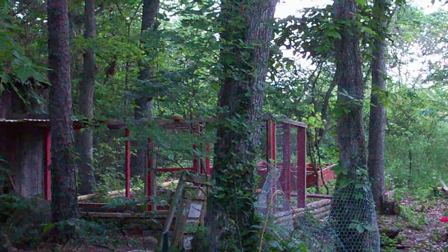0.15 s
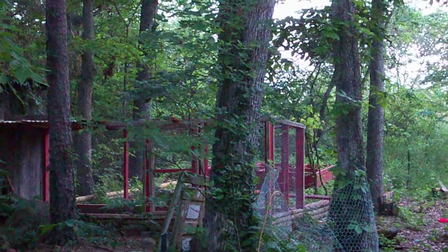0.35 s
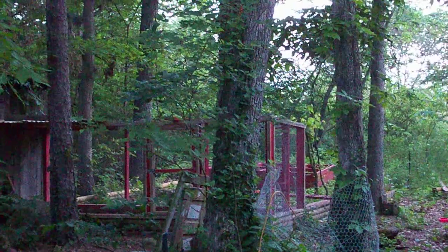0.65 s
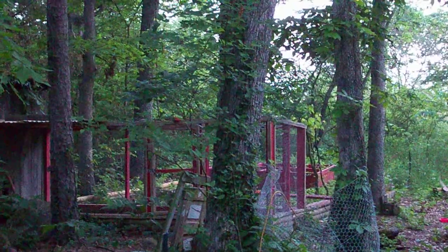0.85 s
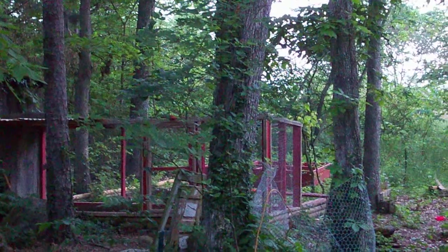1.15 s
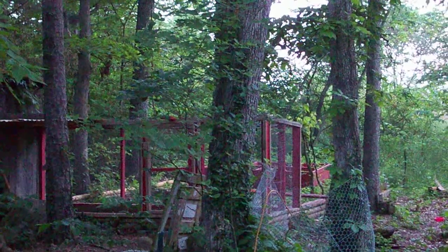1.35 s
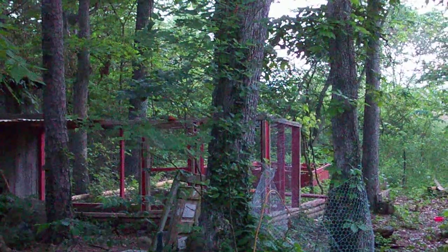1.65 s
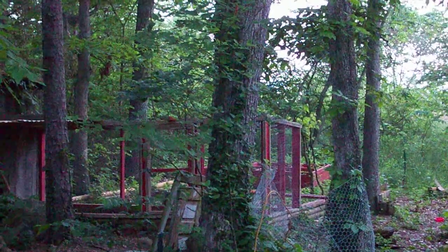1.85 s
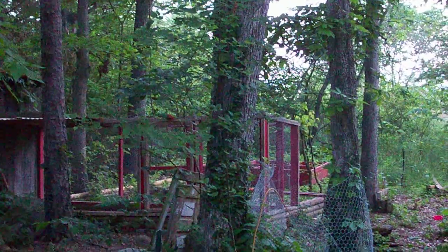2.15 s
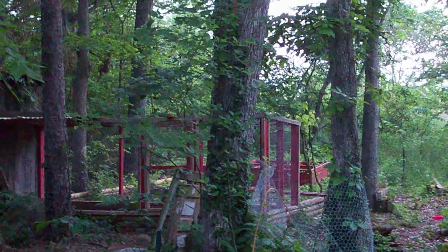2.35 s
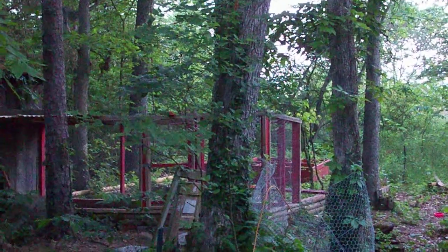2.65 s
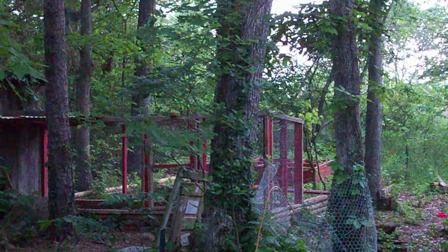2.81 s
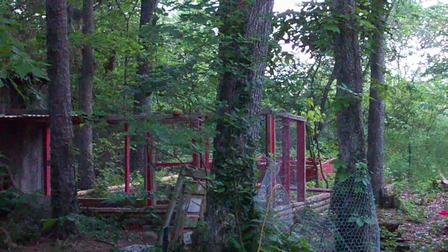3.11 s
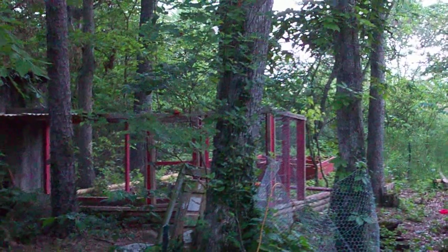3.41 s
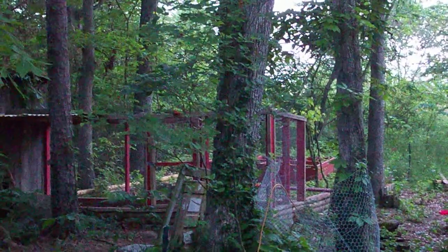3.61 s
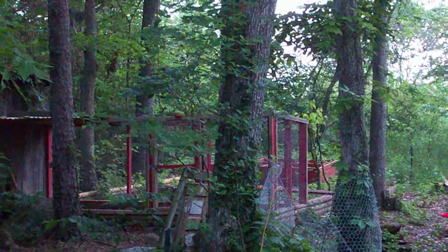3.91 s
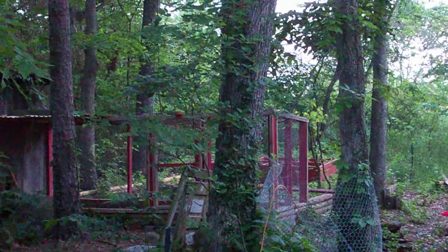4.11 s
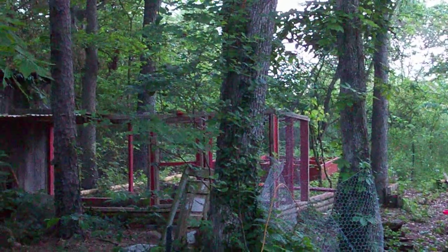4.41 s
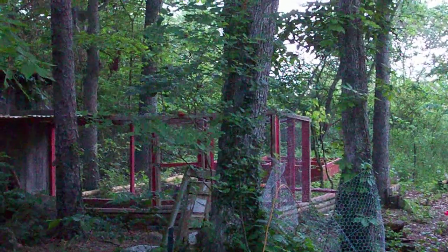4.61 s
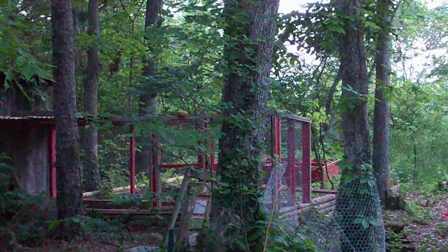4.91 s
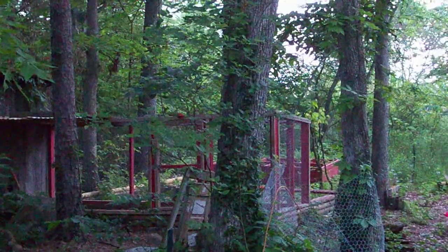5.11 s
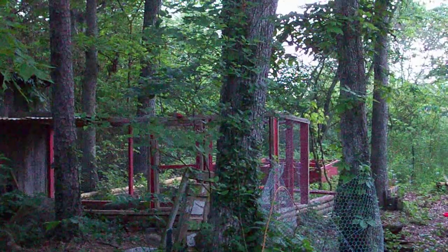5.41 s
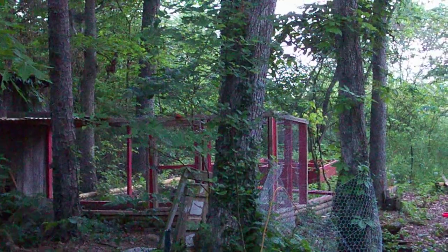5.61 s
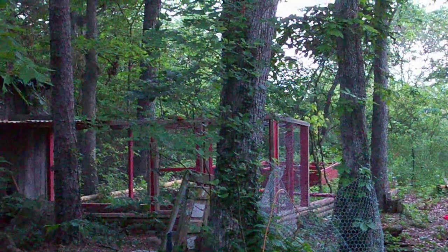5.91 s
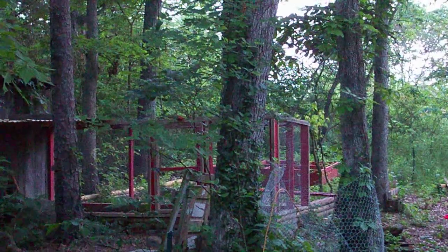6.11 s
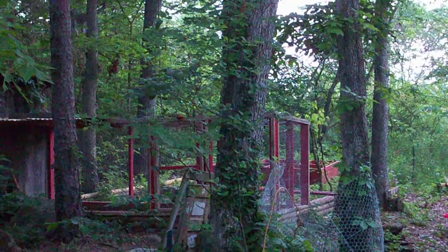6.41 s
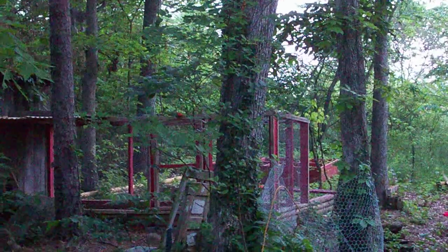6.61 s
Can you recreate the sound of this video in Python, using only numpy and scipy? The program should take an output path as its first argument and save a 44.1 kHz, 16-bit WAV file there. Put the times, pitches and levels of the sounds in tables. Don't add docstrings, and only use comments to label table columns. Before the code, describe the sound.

In a wooded poultry yard, hoarse rooster crows and brassy peacock cries ring among trunks, with chirping birds, soft pecks and thin cricket hiss.

```python
import sys
import numpy as np
from scipy import signal
from scipy.fft import rfft, irfft, next_fast_len
from scipy.io import wavfile
from scipy.ndimage import uniform_filter1d, map_coordinates

SR = 44100
rng = np.random.default_rng(int(sys.argv[2]) if len(sys.argv) > 2 else 0)


def to_linear_factor(level_db):
    exponent = np.asarray(level_db, float) / 20
    return 10 ** exponent


def materialize(psi):
    bounded = np.clip(np.atleast_2d(psi).T, -1, 1)
    quanta = np.round(bounded * 32767).astype(np.int16)
    wavfile.write(sys.argv[1], SR, quanta)


N = 297675
TIME_S = np.arange(N) / SR
CAMERA_HZ = 16000


def unit(x):
    return x / np.sqrt(np.mean(x ** 2) + 1e-20)


def along(points, hz):
    f, v = np.transpose(points)
    return np.interp(np.log(hz + 1), np.log(f + 1), v)


def wobble(rate_hz, count):
    knots = rng.standard_normal(int(count * rate_hz / SR) + 4)
    return map_coordinates(knots, [np.arange(count) * rate_hz / SR])


def filtered(x, response):
    m = next_fast_len(N + 8192)
    return irfft(rfft(x, m) * response(np.fft.rfftfreq(m, 1 / SR)), m)[:N]


def band(hz, width_hz):
    return unit(filtered(rng.standard_normal(N), lambda f: np.exp(-0.5 * ((f - hz) / width_hz) ** 2)))


def played(rows, edge_s):
    s, *columns = np.transpose(rows)
    start = round(s[0] * SR)
    t = np.arange(start, min(round(s[-1] * SR), N)) / SR
    gate = np.clip(np.minimum(t - t[0], t[-1] - t) / edge_s, 0, 1)
    return start, gate, [np.interp(t, s, c) for c in columns]


def placed(start, x):
    return np.pad(x, (start, N - start - len(x)))


def spans(rows, edge_s):
    return sum(v * np.clip(np.minimum(TIME_S - s, s + length_s - TIME_S) / edge_s + 0.5, 0, 1)
               for s, length_s, v in rows)


def bursts(rows, db_per_s):
    gain = 0
    for s, length_s, db in rows:
        outside_s = np.clip(np.maximum(s - TIME_S, TIME_S - s - length_s), 0, None)
        gain = gain + to_linear_factor(db - db_per_s * outside_s)
    return gain


def wood(x, wet_db):
    # (frequency [Hz], t60 [s])
    decay = [(300, 0.46), (1000, 0.94), (2600, 0.59), (5000, 0.69), (8000, 0.6)]
    hz, t, z = signal.stft(rng.standard_normal(SR + SR // 2), SR, nperseg=256)
    tail = signal.istft(z * to_linear_factor(-60 * t / along(decay, hz)[:, None]), SR, nperseg=256)[1]
    build_up = np.clip(np.arange(len(tail)) / (0.012 * SR), 0, 1)
    tail = tail * to_linear_factor(1.5 * wobble(30, len(tail))) * build_up
    return x + to_linear_factor(wet_db) * signal.fftconvolve(x, tail / np.linalg.norm(tail))[:N]


def windpipe(x, lowest_hz):
    return filtered(x, lambda f: 1 / (1 + (lowest_hz / (f + 1)) ** 8))


def partials(hz, tilt_db, rough, throat, k, depth_db):
    shake = 1 + 0.052 * rough * wobble(150.44, len(hz))
    echo = np.array([wobble(34, len(hz)) for _ in k])
    flutter_db = depth_db * np.clip(k * hz / 2500, 0.2, 1.3) ** 0.5 * echo
    octaves = np.log2(np.maximum(k * hz / 1000, 0.9))
    size = to_linear_factor(along(throat, k * hz) + tilt_db * octaves) * (k * hz < CAMERA_HZ / 2)
    return 2 * np.pi * np.cumsum(hz * shake) / SR, size * to_linear_factor(flutter_db)


def levelled(waves, size):
    return np.sum(waves, 0) / np.sqrt(0.5 * uniform_filter1d(np.sum(size ** 2, 0), size=2000))


def cry(rows):
    # (frequency [Hz], level [dB])
    throat = [(200, -11), (500, -8.5), (1200, -2.5), (1800, -6), (3000, -10.5), (4300, -12), (5000, -11),
              (6700, -14.5), (7900, -23.5)]
    # (time [s], frequency [Hz])
    beak_opening = [
        (3.05, 1970),
        (3.14, 3240),
        (3.23, 2690),
        (3.275, 1550),
        (3.31, 980),
        (3.86, 955),
        (5.45, 1620),
        (5.58, 2720),
    ]
    # (start [s], length [s], share [0-1])
    halved = [
        (3.29, 0.06, 1),
        (3.555, 0.1, 1),
    ]
    # (start [s], length [s], added roughness [0-1])
    cracks = [
        (3.24, 0.1, 0.15),
        (3.68, 0.18, 0.2),
        (5.585, 0.03, 0.15),
    ]
    k = np.arange(1, 33)[:, None] / 2
    start, gate, (hz, db) = played(rows, edge_s=0.039)
    now = slice(start, start + len(gate))
    mouth_hz = np.interp(TIME_S[now], *np.transpose(beak_opening))
    half = 0.015 + spans(halved, 0.02)[now]
    rough = 0.11 + spans(cracks, 0.02)[now]
    tilt_db = -2.5 + 4.5 * np.log2(mouth_hz / 2000) + 0.4 * (db + 36.5)
    phase, size = partials(hz, tilt_db, rough, throat, k, depth_db=5.2)
    mouth_db = 8.1 * np.exp(-0.5 * (np.log(k * hz / mouth_hz) / 0.16) ** 2)
    nasal_db = 14.5 * (mouth_hz < 1300) * np.exp(-0.5 * (np.log(k * hz / 4600) / 0.08) ** 2)
    half_gain = np.clip(half, 0, 1) / (1 + (k * hz / 1540) ** 4)
    size = size * to_linear_factor(mouth_db + nasal_db) * np.where(k % 1, half_gain, 1)
    tone = levelled(size * np.sin(k * phase + 0.35 * k ** 2), size)
    return placed(start, to_linear_factor(db) * gate * tone * (1 + np.clip(rough, 0, 1) * wobble(350, len(tone))))


def peacock():
    # (time [s], pitch [Hz], level [dB])
    rising = [
        (3.04, 491.7, -56.5),
        (3.065, 515.2, -41.5),
        (3.109, 550.4, -39),
        (3.143, 580, -32.5),
        (3.173, 608.4, -31),
        (3.225, 618.8, -30),
        (3.25, 599.5, -35.5),
        (3.275, 539.6, -30.5),
        (3.3, 484, -50.5),
    ]
    sinking = [
        (3.29, 469.4, -35),
        (3.332, 466, -54.5),
        (3.366, 489, -40.5),
        (3.428, 505.3, -43),
        (3.499, 491, -43.5),
        (3.549, 477.7, -53.5),
        (3.58, 460.4, -43.5),
        (3.682, 440, -54),
        (3.86, 429, -88),
    ]
    short = [
        (5.445, 573, -50.5),
        (5.478, 615.5, -37.5),
        (5.53, 665, -33.5),
        (5.578, 663.4, -29.5),
        (5.612, 660, -25.5),
    ]
    return wood(windpipe(sum(cry(c) for c in (rising, sinking, short)), 170), wet_db=-8.5)


def crow(rows, offset_hz, tilt_db, steady, thinning, under, count, mixing):
    # (frequency [Hz], level [dB])
    throat = [(500, 4.5), (950, 4), (1400, -3), (1900, -5.5), (2200, -9.5), (2700, -9)]
    # (start [s], length [s], added roughness [0-1])
    hoarse = [
        (0, 0.02, 0.2),
        (0.095, 0.04, 0.45),
        (0.37, 0.07, 0.12),
        (0.44, 0.16, 0.35),
        (0.95, 0.08, 0.2),
        (4.9, 0.6, 0.3),
    ]
    k = np.arange(1, count + 1)[:, None]
    start, gate, (hz, db, second) = played(rows, edge_s=0.022)
    rough = steady + spans(hoarse, 0.038)[start:start + len(gate)]
    phase, size = partials(hz, tilt_db - thinning * (db + 40.5), rough, throat, k, depth_db=4.0)
    beat = 2 * np.pi * np.cumsum(offset_hz * (1 + 0.035 * wobble(10, len(phase)))) / SR
    slap = 0.6 * np.exp(4 * (np.cos(beat + 1.5) - 1))
    share = np.clip(second * np.where(k > 1, mixing, 1), 0, 1.15)
    lower = (0.11 * share[0] + under * rough) * np.exp(-2j * beat)
    sidebands = (1 + share * np.exp(1j * beat) + lower) / np.sqrt(1 + share ** 2)
    pair = np.exp(1j * (phase + share[0] * slap)) * sidebands
    tone = levelled(size * (pair ** k).imag, size)
    return placed(start, to_linear_factor(db) * gate * tone * (1 + np.clip(rough, 0, 1) * wobble(700, len(tone))))


def roosters():
    # (time [s], pitch [Hz], level [dB], second membrane share [0-1])
    near_onset = [
        (0, 838, -32.5, 0),
        (0.018, 1033, -28, 0),
        (0.035, 1096, -40.5, 0.03),
        (0.055, 1089, -50, 0),
        (0.075, 1089, -37, 0.1),
        (0.09, 1032, -28, 0),
        (0.105, 877, -50, 0.7),
        (0.13, 800, -49, 0.3),
    ]
    near_long = [
        (0.125, 879, -47, 0.6),
        (0.145, 906, -32, 0.49),
        (0.2, 949.4, -38, 0.85),
        (0.32, 968.3, -33.5, 0.91),
        (0.42, 903.5, -37, 0.89),
        (0.55, 897.4, -43, 0.12),
        (0.7, 909, -38.5, 0.31),
        (0.92, 898, -47, 1.14),
        (1.0, 843, -46.5, 0.62),
    ]
    far_falling = [
        (0.93, 740.4, -45.5, 0.67),
        (1.2, 715.7, -50.5, 1.4),
        (1.36, 677, -51.5, 1),
        (1.45, 625, -52.5, 0.47),
        (1.51, 593, -71, 0.38),
    ]
    far_cluck = [
        (4.57, 598, -61.5, 0.4),
        (4.615, 773, -58.5, 0.4),
        (4.69, 810, -63, 0.4),
        (4.71, 760, -67, 0.4),
    ]
    far_long = [
        (4.9, 831, -50.5, 0.83),
        (4.94, 868, -55, 0.13),
        (5.2, 872.4, -56.5, 0.24),
        (5.4, 842.7, -52, 0.2),
        (5.72, 852, -54.5, 0.1),
        (5.85, 871, -59, 0.044),
        (6.1, 876.3, -63.5, 0.046),
        (6.6, 855.7, -51.5, 0.024),
        (6.75, 776, -59, 0.03),
    ]
    near = dict(thinning=1.1, under=1.2, count=2, mixing=2.3)
    far = dict(thinning=0, under=0, count=3, mixing=0.13)
    out = crow(near_onset, offset_hz=70, tilt_db=3, steady=0.092, **near)
    out = out + crow(near_long, offset_hz=46, tilt_db=-0.5, steady=0.013, **near)
    out = out + crow(far_falling, offset_hz=65, tilt_db=5, steady=0.18, **far)
    out = out + crow(far_cluck, offset_hz=60, tilt_db=7, steady=0.5, **far)
    out = out + crow(far_long, offset_hz=185, tilt_db=4.5, steady=0.05, **far)
    return wood(windpipe(out, 640), wet_db=-5.5)


def note(rows, flutter_db, waver=0.008):
    start, gate, (hz, db) = played(rows, edge_s=0.0012)
    hz = hz * (1 + waver * wobble(110, len(gate)))
    level = to_linear_factor(db + flutter_db * wobble(68.2, len(gate))) * gate
    return placed(start, np.sqrt(2) * np.sin(2 * np.pi * np.cumsum(hz) / SR) * level)


def whistler():
    # (time after start [s], pitch [Hz], level [dB], share of the final kick [0-1])
    whistle = [
        (0, 2413, -12.5, 0.8),
        (0.026, 2562, -1, 0.46),
        (0.046, 2598, -2, 0.04),
        (0.068, 2618, -10, 0.2),
        (0.077, 2648, -1.5, 0.4),
        (0.086, 2559, 3.5, 0.99),
        (0.094, 2330, -5.5, 1),
        (0.109, 2010, -34.5, 0.3),
    ]
    # (start [s], level [dB], pitch factor, length factor, kick [dB])
    whistles = [
        (1.524, -32, 1.006, 1, -13),
        (1.78, -33, 1.007, 0.81, -12.5),
        (3.904, -42, 1.007, 1.08, 0),
        (4.155, -40, 1.014, 0.96, 4.5),
        (4.392, -46, 1.0, 1.12, 11.5),
        (4.642, -38.5, 1.0, 0.85, -1),
    ]
    # (delay [s], level [dB])
    walls = [
        (0.021, -7),
        (0.044, -8.5),
    ]
    after, hz, shape_db, share = np.transpose(whistle)
    out = 0
    for s, db, high, long, kick_db in whistles:
        rows = np.transpose([s + long * after, high * hz, db + shape_db + kick_db * share])
        out = out + note(rows, flutter_db=2.5, waver=0.0016)
    echoes = sum(to_linear_factor(db) * np.roll(out, round(s * SR)) for s, db in walls)
    return wood(out + echoes, wet_db=-7)


def warbler():
    # (time after start [s], pitch [Hz], level [dB])
    warble = [
        (0, 2500, -8),
        (0.03, 2850, 0),
        (0.07, 2780, -4),
        (0.1, 3050, -2),
        (0.135, 3750, 0),
        (0.16, 3720, -1),
        (0.19, 3400, -4),
        (0.22, 3250, -12),
    ]
    # (start [s], level [dB], pitch factor, length factor)
    warbles = [
        (1.26, -54, 1.0, 0.95),
        (3.325, -49, 1.0, 0.95),
        (6.08, -49.5, 1.0, 1.1),
    ]
    out = 0
    for s, db, high, long in warbles:
        rows = np.array(warble) * [long, high, 1] + [s, 0, db]
        out = out + note(rows, flutter_db=4.5, waver=0.005)
    return wood(out * to_linear_factor(-1), wet_db=-1.5)


def slide(s, hz, hold_s, fall_s, end_hz, db):
    drop_s, drop_hz = s + hold_s, end_hz - hz
    return note([(s, hz, db - 6),
                 (s + 0.9 * hold_s, hz * 0.99, db - 6),
                 (drop_s + 0.1 * fall_s, hz + 0.15 * drop_hz, db),
                 (drop_s + 0.4 * fall_s, hz + 0.58 * drop_hz, db - 2),
                 (drop_s + fall_s, end_hz, db - 9)], flutter_db=5, waver=0.012)


def seep(s, sag_s, hz, end_hz, db):
    first_hz, flick_s = 7990, 0.021
    flick_db = db - 5 + 8.5 * (hz - end_hz) / 1000
    return note([(s, first_hz, db),
                 (s + 0.7 * sag_s, hz + 0.14 * (first_hz - hz), db),
                 (s + sag_s, hz, db + 3),
                 (s + sag_s + 0.41 * flick_s, hz + 0.15 * (end_hz - hz), flick_db),
                 (s + sag_s + flick_s, end_hz, flick_db - 8.5)], flutter_db=4.5, waver=0.0022)


def glide(s, hz, end_hz, hold_s, db):
    rise_s = 0.028
    return note([(s, hz, db),
                 (s + 0.6 * rise_s, hz + 0.73 * (end_hz - hz), db),
                 (s + rise_s, end_hz, db - 5.5),
                 (s + rise_s + hold_s, end_hz, db)], flutter_db=7.5)


def songbirds():
    # (start [s], held pitch [Hz], end pitch [Hz], level [dB])
    slides = [
        (4.478, 5850, 4640, -53),
        (4.76, 5890, 4140, -51),
        (5.052, 5750, 3800, -51),
        (5.328, 5575, 3310, -50),
        (5.62, 5350, 3300, -48.5),
        (5.865, 5190, 3180, -48),
    ]
    # (start [s], first pitch [Hz], end pitch [Hz], length [s], level [dB])
    chips = [
        (0.283, 7610, 6730, 0.053, -57.5),
        (0.682, 7200, 5880, 0.026, -57),
        (1.215, 3630, 2890, 0.03, -55),
        (2.19, 5350, 2900, 0.035, -55.5),
        (4.097, 7330, 4960, 0.04, -55),
        (4.249, 5300, 4870, 0.025, -54),
        (6.113, 5920, 3300, 0.075, -49.5),
    ]
    # (start [s], length [s], pitch [Hz], level [dB])
    level_notes = [
        (2.514, 0.14, 2448, -66),
        (4.005, 0.09, 4680, -63.5),
        (4.204, 0.13, 4680, -68),
        (4.556, 0.068, 4605, -59),
        (4.733, 0.044, 4600, -57.5),
        (5.85, 0.045, 5800, -59),
        (6.25, 0.28, 2182, -78),
    ]
    # (start [s], sag [s], sagged pitch [Hz], flick end pitch [Hz], level [dB])
    seeps = [
        (1.5, 0.18, 7790, 6880, -53),
        (1.75, 0.14, 7650, 6900, -50),
        (1.935, 0.075, 7770, 5800, -56.5),
        (4.74, 0.15, 7725, 7300, -59),
        (4.9, 0.13, 7800, 7400, -58),
        (5.05, 0.18, 7750, 6050, -54),
    ]
    # (start [s], first pitch [Hz], held pitch [Hz], hold [s], level [dB])
    glides = [
        (2.515, 4500, 5500, 0.04, -58),
        (2.845, 3300, 5550, 0.04, -56),
        (6.335, 3600, 5400, 0.008, -49),
        (2.58, 1700, 2100, 0.03, -65),
        (2.74, 2500, 3100, 0.015, -67),
    ]
    out = sum(slide(s, hz, 0.056, (hz - end_hz) / 22000, end_hz, db) for s, hz, end_hz, db in slides)
    out = out + sum(slide(s, hz, 0.004, long_s, end_hz, db) for s, hz, end_hz, long_s, db in chips)
    for s, long_s, hz, db in level_notes:
        out = out + note([(s, hz, db), (s + long_s, 0.99 * hz, db)], flutter_db=5)
    out = out + sum(seep(*row) for row in seeps) + sum(glide(*row) for row in glides)
    return wood(out * to_linear_factor(-4), wet_db=2.5)


def knocks():
    # (time [s], level [dB], centre [Hz])
    puffs = [
        (1.0, -57, 4000),
        (1.185, -53, 500),
        (1.48, -52, 1000),
        (2.04, -57, 1000),
        (2.3, -54, 1000),
        (6.46, -51, 700),
        (6.47, -55, 1300),
        (0.83, -54, 2200),
        (0.11, -46, 1600),
        (0.45, -50, 1700),
    ]
    out, t = np.zeros(N + 2000), np.arange(2000) / SR
    for s, db, hz in puffs:
        b, a = signal.butter(1, [hz * 0.74, hz * 1.2], "band", fs=SR)
        puff = unit(signal.lfilter(b, a, rng.standard_normal(2000)))
        decay = to_linear_factor(db + 3 - 60 * t / 0.09) * np.clip(t / 0.004, 0, 1)
        out[round(s * SR):][:2000] += decay * puff
    return wood(out[:N], wet_db=-9)


def insects():
    # (start [s], length [s], level [dB])
    rasps = [
        (0.55, 0.13, -74),
        (2.33, 0.11, -63),
        (2.71, 0.092, -60.5),
        (3.02, 0.045, -64),
        (3.8, 0.11, -71.5),
        (4.72, 0.056, -70.5),
        (5.08, 0.49, -73),
    ]
    buzzes = [
        (3.4, 0.31, -55),
        (5.87, 0.021, -63.5),
        (6.15, 0.2, -66.5),
    ]
    chorus_gain = to_linear_factor(-59.5 + 0.5 * wobble(0.4, N) + 0.33 * wobble(30, N))
    chorus = chorus_gain * (0.67 * band(4270, 110) + 0.55 * band(4004, 310))
    rasp_gain = to_linear_factor(-77 + 1.9 * wobble(3, N)) + bursts(rasps, db_per_s=137)
    rasp = rasp_gain * to_linear_factor(0.96 * wobble(25, N)) * band(6507, 210)
    swell = band(5760, 740) + 0.97 * band(6870, 490)
    return chorus + rasp + bursts(buzzes, db_per_s=72.5) * to_linear_factor(1.5 * wobble(40, N) - 2) * swell


def motor():
    # (time [s], pitch [Hz], level [dB])
    hum_track = [
        (0, 71.4, -49.5),
        (1.4, 71.7, -52),
        (1.9, 72, -56.5),
        (2.2, 71.8, -81),
        (2.6, 70.7, -76),
    ]
    start, gate, (hz, db) = played(hum_track, edge_s=0.002)
    hum = np.sqrt(2) * to_linear_factor(db + 1.0 * wobble(6, len(hz))) * np.sin(2 * np.pi * np.cumsum(hz) / SR)
    return placed(start, hum)


def hush():
    # (frequency [Hz], density [dB per Hz])
    air = [(10, -30.5), (25, -23), (50, -23), (110, -32.5), (180, -37.5), (500, -42), (1000, -45),
           (1900, -50.5), (2500, -43), (3400, -46.5), (4700, -49), (6500, -50.5), (8000, -51)]
    noise = filtered(rng.standard_normal(N), lambda f: to_linear_factor(along(air, f)))
    middle = filtered(noise, lambda f: (f > 150) & (f < 3500))
    return to_linear_factor(-61.5 + 0.23 * wobble(3.91, N)) * noise / np.std(middle)


def scene():
    fowl = peacock() + roosters()
    birds = whistler() + warbler() + songbirds()
    return (fowl + birds + knocks() + insects() + motor() + hush())[None]


def roll_off(x):
    return signal.sosfilt(signal.butter(12, 9020, fs=SR, output="sos"), x)


def record(dry):
    kept = filtered(dry[0], lambda f: f < CAMERA_HZ / 2)
    mirrored = kept * (1 + 2 * np.cos(2 * np.pi * CAMERA_HZ * TIME_S))
    # (frequency [Hz], gain [dB])
    soft_filter = [(6500, 1.0), (7600, 2.0), (8000, -3.5), (8400, -10), (8800, -25), (9100, -34), (9500, -90)]
    smooth = filtered(mirrored, lambda f: to_linear_factor(along(soft_filter, f)))
    return roll_off((smooth - 0.0245)[None])


dry = scene()
out = record(dry)
materialize(out)
```